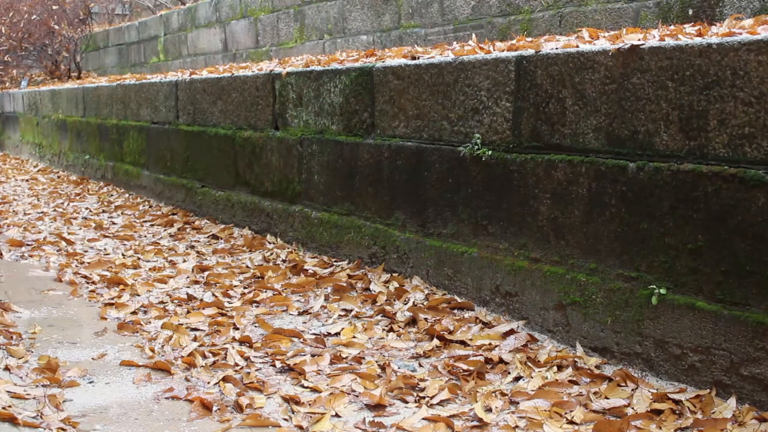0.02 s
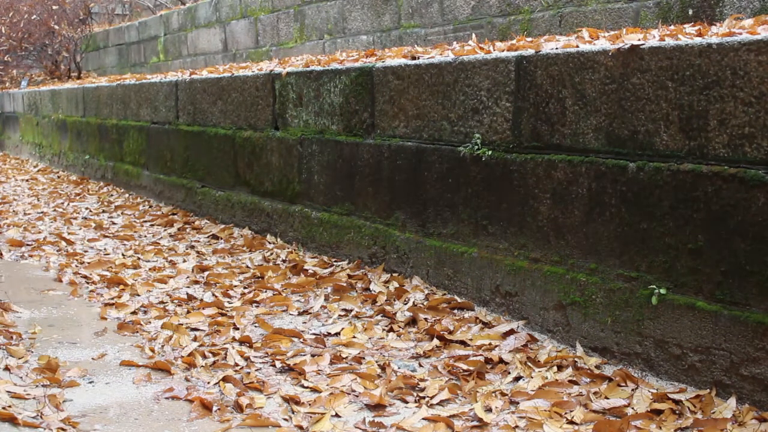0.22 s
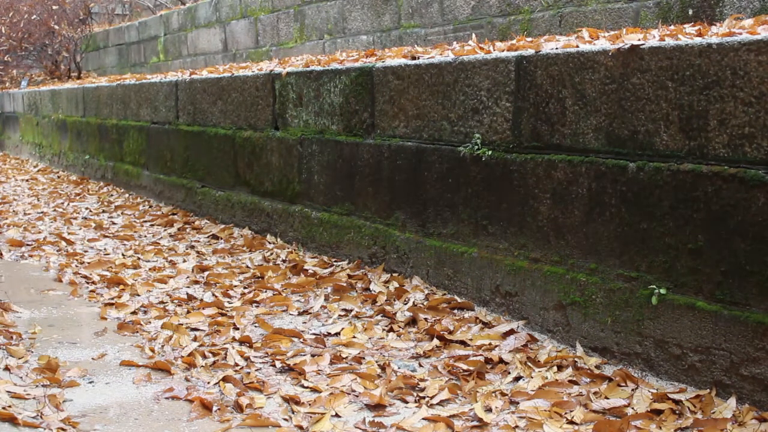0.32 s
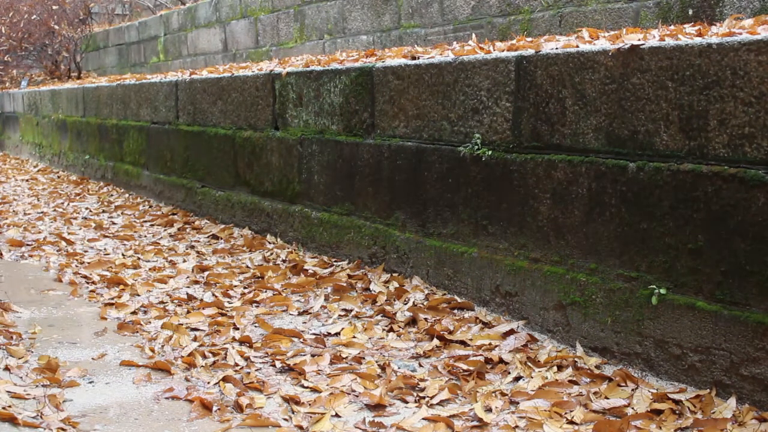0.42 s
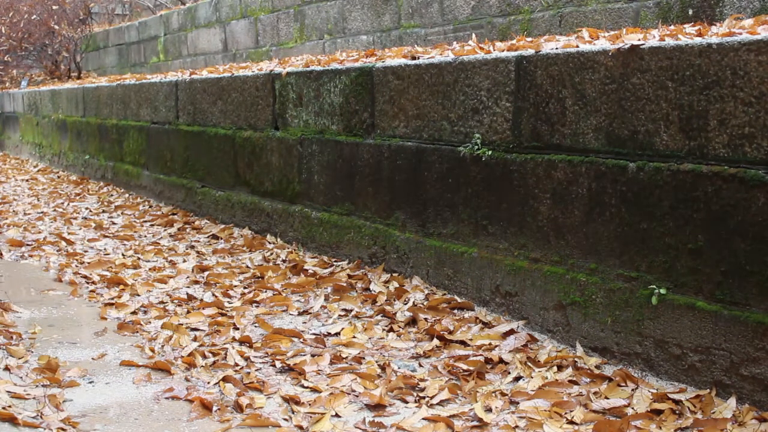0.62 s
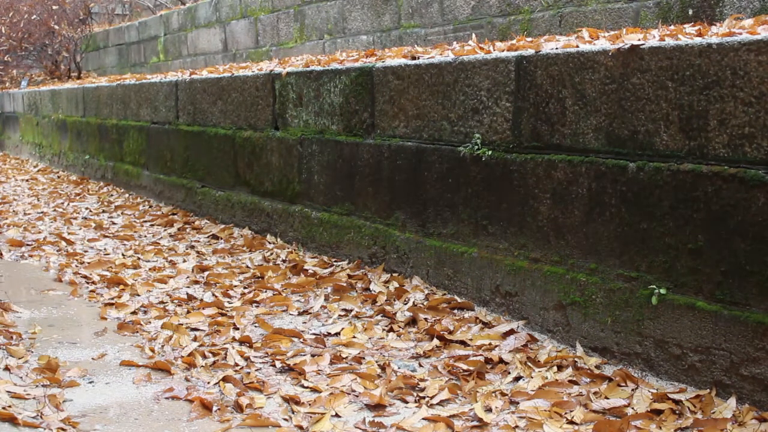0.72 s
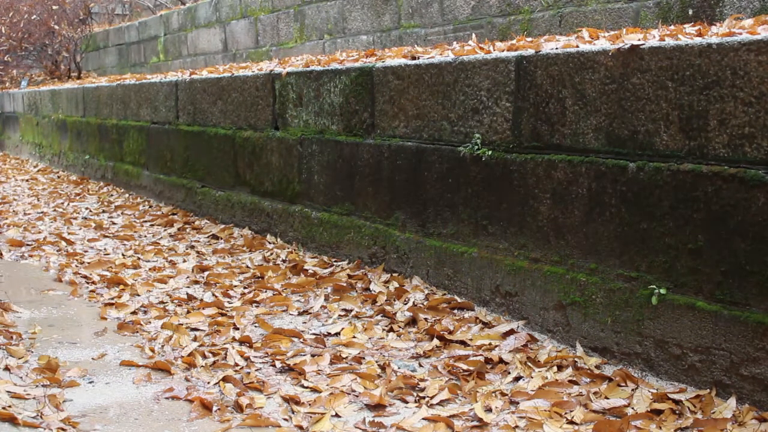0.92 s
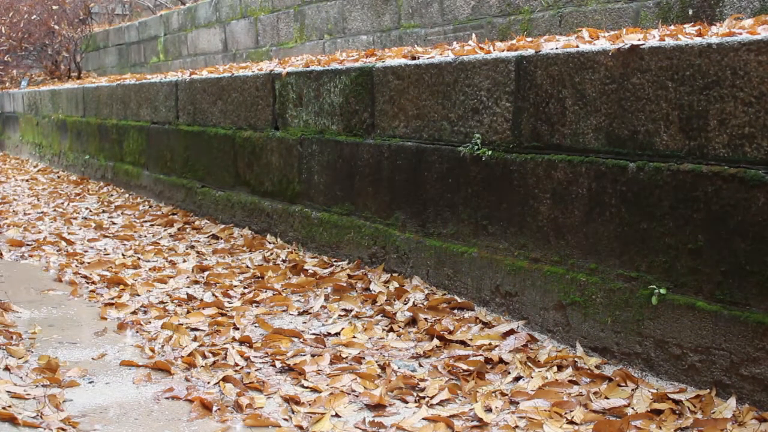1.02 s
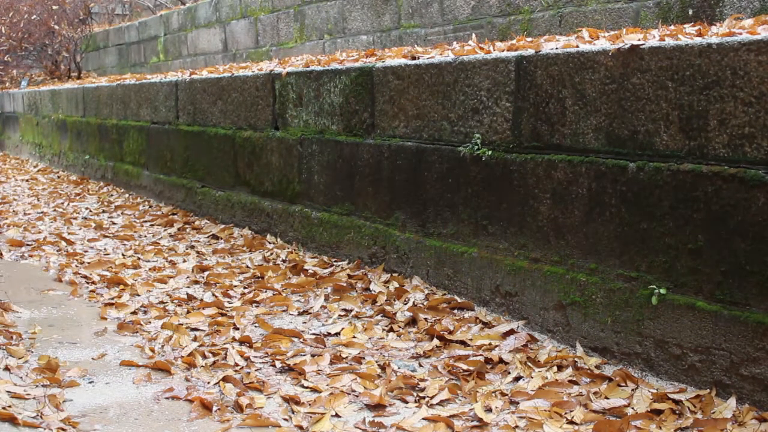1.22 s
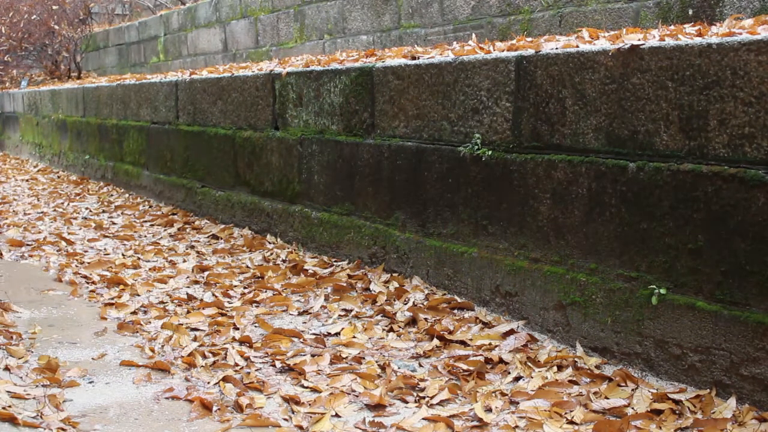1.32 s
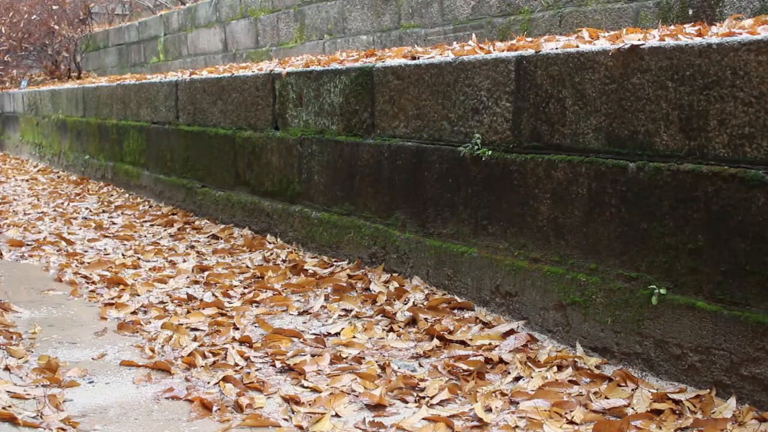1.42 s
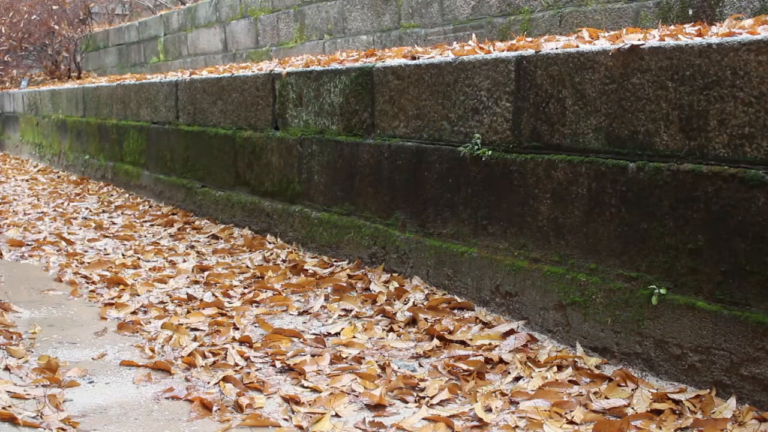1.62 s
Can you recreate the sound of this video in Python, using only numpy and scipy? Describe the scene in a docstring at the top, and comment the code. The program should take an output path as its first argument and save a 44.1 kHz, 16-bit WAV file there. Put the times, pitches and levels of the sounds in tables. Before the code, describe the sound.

Close rain drips on leaf litter and puddled paving over a fine steady rain wash; small ticks, one hard splash, a duller plop, then crisp late drops, with a distant thin bird outdoors.

```python
"""Light rain falls on a shallow puddle and wet leaves beside a stone wall in a quiet courtyard.
From the start there is fine far rain, patter and a bird's thin notes, with soft drops and a bubble.
Just after 0.4 s the loudest drops strike and a bubble rings on; air rumble swells near 0.8 s, when
spray sizzles on the leaves. Near 1.4 s come sharp drops, then a last bubble and a last faint drop.
Drops and bubbles are dying tones, the bird is gliding tones, the rest is shaped noise or tiny clicks."""
import sys
import numpy as np
from scipy import signal
from scipy.fft import rfft, irfft
from scipy.io import wavfile

SR = 44100
rng = np.random.default_rng(int(sys.argv[2]) if len(sys.argv) > 2 else 0)


def file_out(sig):
    """Save sig as 16-bit WAV at sys.argv[1]."""
    # one column per channel
    cols = np.atleast_2d(sig).T
    # limit, then scale
    lim = np.clip(cols, -1, 1)
    pcm = np.round(lim * 32767).astype(np.int16)
    wavfile.write(sys.argv[1], SR, pcm)


N = 72765  # length in samples


def from_db(db):
    """Turn decibels into gain."""
    return 10 ** (np.asarray(db) / 20)


def rms_one(x):
    """Scale a sound to an average strength (rms) of 1."""
    return x / np.sqrt(np.mean(x ** 2) + 1e-20)


def level(rows):
    """Gain over time, joining (time [s], level [dB]) points with straight lines."""
    times, levels_db = np.transpose(rows)
    return from_db(np.interp(np.arange(N) / SR, times, levels_db))


def colour(x, points):
    """Filter by a curve of (frequency [Hz], gain [dB]) points, joined on a log frequency scale."""
    hz, db = np.transpose(points)
    bin_hz = np.maximum(np.arange(N // 2 + 1) * SR / N, 1)
    gain = from_db(np.interp(np.log(bin_hz), np.log(hz), db))
    return irfft(rfft(x) * gain, N)


def one_pole(x, hz, kind):
    """Gentle low-pass or high-pass filter."""
    return signal.sosfilt(signal.butter(1, hz, kind, fs=SR, output="sos"), x)


def drift(rate_hz):
    """Random wandering with an rms of 1; a higher rate wanders faster."""
    r = np.exp(-2 * np.pi * rate_hz / SR)
    wander = signal.lfilter([1], [1, -2 * r, r * r], rng.standard_normal(2 * N))
    return rms_one(wander[N:])  # skip the filter's start-up


def add(out, start_s, sound):
    """Mix a sound in at a given time."""
    i = int(np.clip(start_s * SR, 0, N - 1))
    out[i:i + len(sound)] += sound[:N - i]


def yard(x, t60_s):
    """Diffuse reflections from the stone walls, dying by 60 dB in t60_s."""
    t = np.arange(SR // 2) / SR
    tail = rng.standard_normal(len(t)) * from_db(-60 * t / t60_s)
    return signal.fftconvolve(x, tail / np.linalg.norm(tail))[:N]


def noise(spectrum):
    """Smooth coloured noise with an rms of 1."""
    return rms_one(colour(rng.standard_normal(N), spectrum))


def grains(per_s, spread_db, spectrum):
    """Random tiny impacts of uneven size, each ringing briefly in one of 12 bands."""
    edges = np.geomspace(500, 16000, 13)  # band edges in Hz
    sizes = from_db(spread_db * np.minimum(rng.exponential(1, N), 4)) * rng.choice([-1, 1], N)
    clicks = sizes * (rng.random(N) < per_s / SR)
    chosen_band = rng.integers(0, len(edges) - 1, N)
    out = np.zeros(N)
    for k, band in enumerate(zip(edges, edges[1:])):
        band_filter = signal.butter(2, band, "band", fs=SR, output="sos")
        out += signal.sosfilt(band_filter, clicks * (chosen_band == k) + 1e-18)
    return rms_one(colour(out, spectrum))


# Near drops, each with two rings and a splash; the row at 0.3224 s is the wall throwing back the drop just
# before it: (time [s], main ring [Hz], main level [dB], # second ring [Hz], second level [dB], time for the
# rings to swell to their peak [ms], splash level [dB])
NEAR_DROPS = [ (0.0795, 1550, -24, 5400, -25, 0.13, -19), (0.1256, 1200, -25, 5230, -30, 0.2, -17),
              (.1996, 1550, -30, 5050, -26, 0.14, -20), (0.2401, 2200, -21.5, 1470, -27.5, 0.49, -11),
              (0.2774, 2430, -25, 8270, -26, 0.32, -16), (0.2863, 8100, -25.5, 2300, -37, .2, -32),
              (0.2967, 5300, -24, 1650, -27, 0.39, -16), (0.3054, 6800, -28, 1680, -31, 0.31, -19),
              (0.3191, 10100, -13, 4100, -20, 0.14, -11), (0.3224, 10400, -44, 1540, -35, 0.13, -6),
              (.3640, 715, -25, 3960, -39, 0.81, -13.5), (0.4222, 2210, -2.5, 3080, -2.5, 0.19, 2),
              (0.4228, 4140, -10, 2950, -15, 0.48, -29), (0.4267, 2060, -14.5, 1530, -44, 0.61, -23),
              (0.7115, 1470, -8, 4670, -17.5, 0.32, -27), (.7210, 1300, -14, 3700, -21, 0.29, -27),
              (0.8066, 820, -27.5, 2150, -35, .35, -14), (0.8215, 870, -30, 516, -26, 0.76, -26),
              (0.852, 5140, -26, 4540, -27, 0.69, -17), (.9486, 1300, -26.5, 1010, -29, 0.72, -24),
              (1.117, 2930, -30.5, 880, -32.5, 0.54, -12.5), (1.17, 1370, -27, 3270, -31, 0.29, -17.5),
              (1.1880, 706, -29, 4130, -31, 0.38, -20), (1.2432, 1490, -25, 1950, -25.5, 0.63, -27),
              (1.3551, 1810, -17.5, 3240, -25, 0.13, -5.5), (1.3901, 7320, -9.5, 3980, -10.5, .15, -1),
              (1.3979, 4260, -23.5, 1210, -22.5, 0.19, -15), (1.4497, 1090, -26.5, 2800, -25.5, 0.42, -21),
              (1.4915, 11500, -39, 10600, -44, 0.17, -38), (1.5136, 1390, -27.5, 3600, -40, 0.84, -20.5), ]
SPLASH_DECAY_S, SPLASH_TOP_HZ = 0.0015, 11200
SCATTER_DECAY_S, SCATTER_DB = 0.0053, -5  # droplets thrown by each splash
DROP_LOW_CUT_HZ = 453
WALL_ECHO_S, WALL_ECHO_DB = 0.0045, -20
DROP_YARD_T60_S, DROP_YARD_TOP_HZ, DROP_YARD_DB = 0.096, 3380, -7


def near_drops():
    """Each drop sets two heavily damped rings going and throws a short splash; wall and yard answer."""
    out, t = np.zeros(N), np.arange(SR // 40) / SR
    for start_s, main_hz, main_db, second_hz, second_db, swell_ms, splash_db in NEAR_DROPS:
        main_ring = from_db(main_db) * np.sin(2 * np.pi * main_hz * t)
        second_ring = from_db(second_db) * np.sin(2 * np.pi * second_hz * t)
        age = t * 1000 / swell_ms
        swell_and_die = age * np.exp(1 - age)  # peaks at 1 when age is 1
        fade = np.exp(-t / SPLASH_DECAY_S) + from_db(SCATTER_DB) * np.exp(-t / SCATTER_DECAY_S)
        splash = rng.standard_normal(len(t)) * fade
        splash = splash / np.linalg.norm(splash)
        for _ in range(2):  # two passes soften the top more steeply
            splash = one_pole(splash, SPLASH_TOP_HZ, "low")
        add(out, start_s, (main_ring + second_ring) * swell_and_die + from_db(splash_db) * splash)
    out = signal.sosfilt(signal.butter(2, DROP_LOW_CUT_HZ, "high", fs=SR, output="sos"), out)
    echo = np.interp(np.arange(N) - WALL_ECHO_S * SR, np.arange(N), out)
    reflections = one_pole(yard(out, DROP_YARD_T60_S), DROP_YARD_TOP_HZ, "low")
    return out + from_db(WALL_ECHO_DB) * echo + from_db(DROP_YARD_DB) * reflections


# Bubbles left ringing in the puddle:
# (time [s], starting pitch [Hz], level before flutter [dB], time to die by 60 dB [s])
RINGING_BUBBLES = [(.046, 3500, -35, 0.045), (.431, 2263, -27, 0.19), (1.469, 3500, -36.5, 0.047)]
BUBBLE_RISE_PER_S, BUBBLE_WOBBLE = 0.34, 0.066  # both as a share of the pitch
BUBBLE_FLUTTER_DB = 3.5


def bubbles():
    """Trapped bubbles ring roughly in the stirred water, rising a little in pitch."""
    out, t = np.zeros(N), np.arange(N) / SR
    for start_s, hz, db, t60_s in RINGING_BUBBLES:
        pitch = hz * (1 + BUBBLE_RISE_PER_S * t + BUBBLE_WOBBLE * drift(250))
        decay = from_db(-60 * t / t60_s)
        loudness = from_db(db + BUBBLE_FLUTTER_DB * drift(220))
        add(out, start_s, decay * loudness * np.sin(2 * np.pi * np.cumsum(pitch) / SR))
    return out


# Bird notes: (time [s], length [s], level before shaping and mixing [dB], start pitch [Hz],
# middle pitch [Hz], end pitch [Hz], pitch waver [share of the pitch])
BIRD_NOTES = [ (.01, .11, -52, 4190, 5290, 6010, .06), (.243, 0.039, -41.5, 4350, 4960, 5470, .008),
              (0.352, 0.069, -49, 5500, 5800, 5130, 0.053), (0.634, 0.09, -46, 5210, 5600, 5080, 0.067),
              (1.015, 0.066, -44.5, 5290, 5640, 5830, 0.064),
              (1.242, 0.077, -52.5, 5060, 5880, 5630, 0.086), ]
BIRD_T60_S, BIRD_DIRECT_DB, BIRD_YARD_DB = 0.14, -2, -2


def bird():
    """Thin wavering whistles along a curve of pitch, heard largely through reflections."""
    out = np.zeros(N)
    for start_s, length_s, db, start_hz, middle_hz, end_hz, waver in BIRD_NOTES:
        progress = np.linspace(0, 1, int(length_s * SR))
        curve = np.polyfit([0, 0.5, 1], [start_hz, middle_hz, end_hz], 2)
        pitch = np.polyval(curve, progress) * (1 + waver * drift(340)[:len(progress)])
        swell = np.sqrt(2 * np.abs(np.sin(np.pi * progress)))
        add(out, start_s, from_db(db) * swell * np.sin(2 * np.pi * np.cumsum(pitch) / SR))
    return from_db(BIRD_DIRECT_DB) * out + from_db(BIRD_YARD_DB) * yard(out, BIRD_T60_S)


# Loudness of the patter on the leaves: (time [s], level [dB])
PATTER_LOUDNESS = [(0, -45), (.15, -44), (.35, -46), (.5, -46), (.58, -48), (.7, -44), (.9, -53.5),
                   (1.1, -43.5), (1.2, -50.5), (1.32, -44), (1.47, -47.5), (1.6, -57.5)]
# Tone of the patter: (frequency [Hz], relative level [dB])
PATTER_TONE = [(700, -12), (1500, -11), (2000, -3), (2550, 2.5), (3200, -4.5), (5000, -6.5), (7000, -11),
               (15000, -41)]


def leaf_patter():
    """Many tiny drops strike the leaves, 4300 a second on average."""
    return level(PATTER_LOUDNESS) * grains(4300, spread_db=2.5, spectrum=PATTER_TONE)


# Loudness of the fine spray: (time [s], level [dB])
SPRAY_LOUDNESS = [(0, -77), (.12, -55.5), (.24, -58), (.33, -46.5), (.42, -59), (.58, -65), (.79, -60),
                  (.82, -47.5), (.93, -45.5), (1.08, -57), (1.15, -70), (1.33, -81), (1.41, -54),
                  (1.5, -65), (1.65, -58)]
# Tone of the spray: (frequency [Hz], relative level [dB])
SPRAY_TONE = [(3000, -30), (6000, 0.5), (8500, 4), (11000, -10.5), (15000, -19.5)]


def spray():
    """Finer, denser and brighter impacts, 7200 a second on average, sizzle on the leaves."""
    return level(SPRAY_LOUDNESS) * grains(7200, spread_db=4.5, spectrum=SPRAY_TONE)


# Loudness of the high haze around the bird: (time [s], level [dB])
HAZE_LOUDNESS = [(0, -44), (.2, -52), (.38, -43), (.5, -46.5), (.58, -54), (.66, -46), (.78, -46.5),
                 (.92, -42.5), (1.07, -51), (1.16, -57), (1.3, -49.5), (1.42, -58), (1.52, -54),
                 (1.65, -65)]
# Tone of the haze: (frequency [Hz], relative level [dB])
HAZE_TONE = [(2500, -17), (3500, -1.5), (4400, 5), (5600, 1.5), (6600, -6), (8000, -20)]


def haze():
    """High noise around the bird's pitch, rising and falling in level."""
    return level(HAZE_LOUDNESS) * noise(HAZE_TONE)


# Tone of the far rain: (frequency [Hz], relative level [dB])
FAR_RAIN_TONE = [(100, -4), (230, -9), (380, -1), (800, -0.5), (1100, -2), (1450, 1), (1900, -5.5),
                 (3200, -11.5), (5000, -14.5), (8000, -21.5), (12000, -26), (16000, -29)]
FAR_RAIN_DB, FAR_RAIN_FLICKER_DB = -43.5, 1.1


def far_rain():
    """The even wash of countless far drops, as noise that flickers slightly in level."""
    return from_db(FAR_RAIN_DB + FAR_RAIN_FLICKER_DB * drift(77)) * noise(FAR_RAIN_TONE)


# Loudness of the air on the microphone: (time [s], level [dB])
RUMBLE_LOUDNESS = [(0, -57.5), (.6, -60.5), (.8, -43.5), (1.0, -46.5), (1.2, -51), (1.65, -53)]
# Tone of the rumble before a gentle low-pass: (frequency [Hz], relative level [dB])
RUMBLE_TONE = [(20, 6.5), (55, 4), (90, -10), (150, -25.5), (300, -40)]


def air_rumble():
    """Air moving over the microphone makes a deep, uneven rumble."""
    rumble = one_pole(noise(RUMBLE_TONE), 270, "low")
    return level(RUMBLE_LOUDNESS) * rms_one(rumble)


# Stereo spread of the far rain: (frequency [Hz], gain of the side signal [dB])
RAIN_WIDTH = [(60, -53), (250, -30), (1500, -54), (5000, -43.5), (9000, -9), (14000, -2)]


def scene():
    """Every source sits in the middle; a second far rain, mostly its top, spreads to the sides."""
    mid = near_drops() + bubbles() + bird()
    mid += leaf_patter() + spray() + haze() + far_rain() + air_rumble()
    side = colour(far_rain(), RAIN_WIDTH)
    return np.array([mid + side, mid - side])


def record(dry):
    """Clip peaks beyond full scale, then cut the top by 70 dB from 16600 Hz up."""
    top_cut = signal.cheby2(16, 70, 16600, fs=SR, output="sos")
    return signal.sosfilt(top_cut, np.clip(dry, -1, 1))


dry = scene()
out = record(dry)
file_out(out)
```